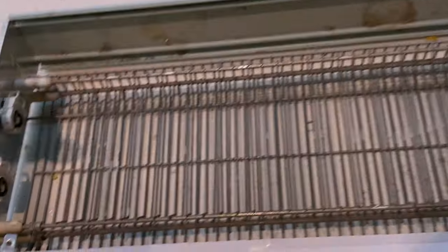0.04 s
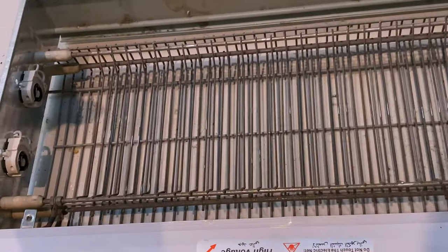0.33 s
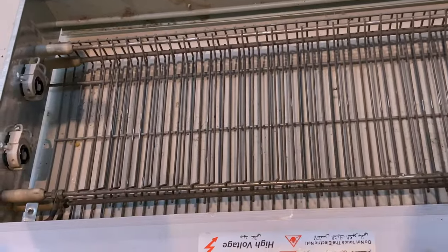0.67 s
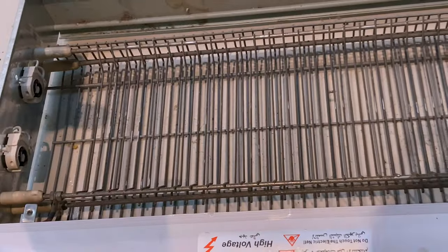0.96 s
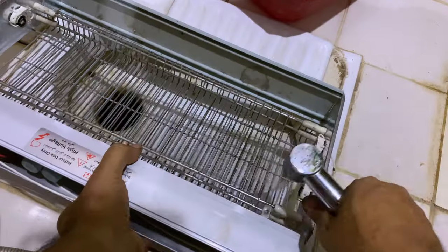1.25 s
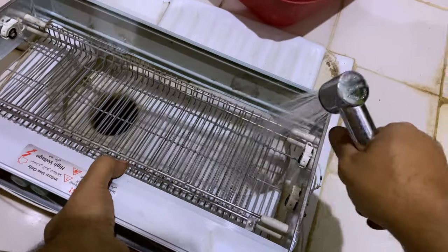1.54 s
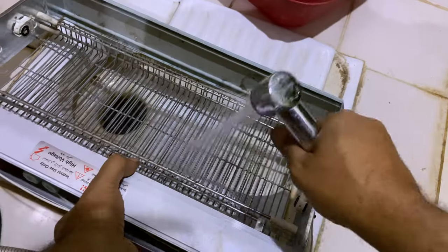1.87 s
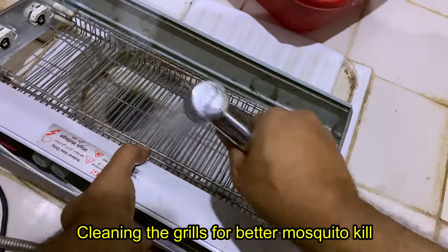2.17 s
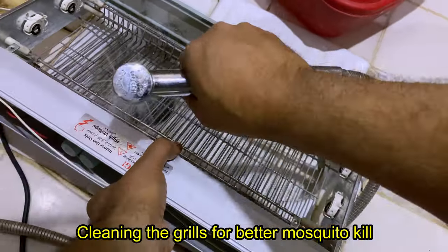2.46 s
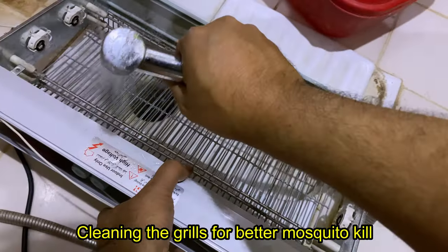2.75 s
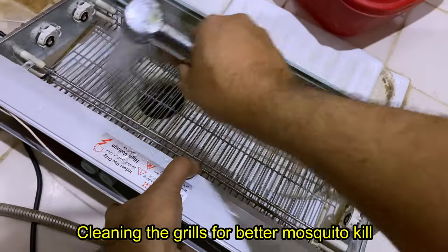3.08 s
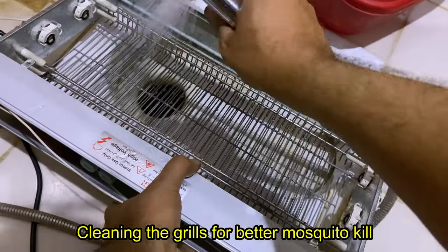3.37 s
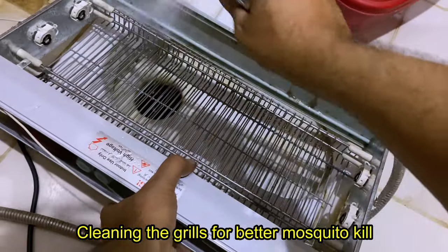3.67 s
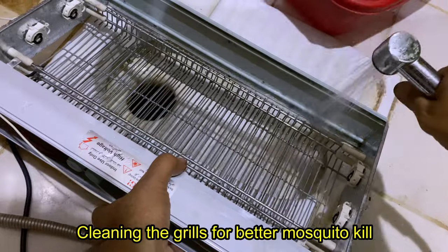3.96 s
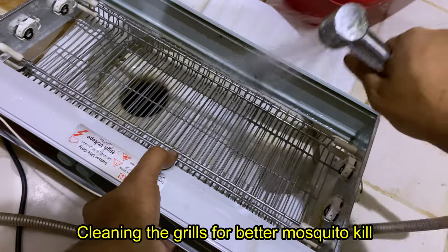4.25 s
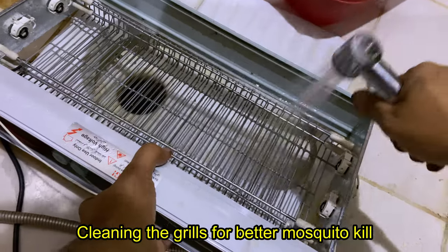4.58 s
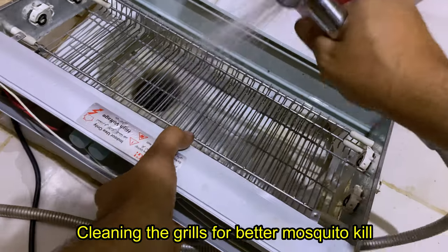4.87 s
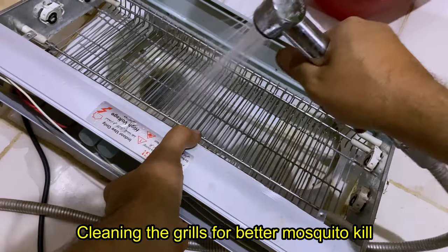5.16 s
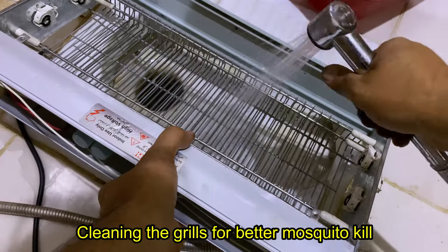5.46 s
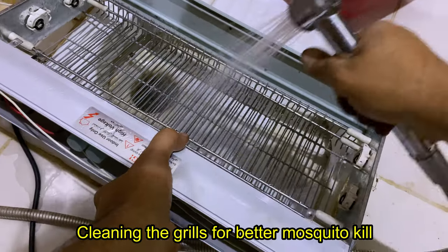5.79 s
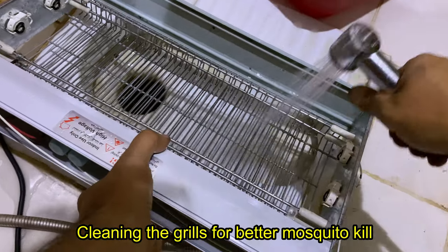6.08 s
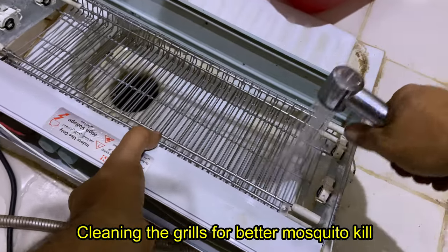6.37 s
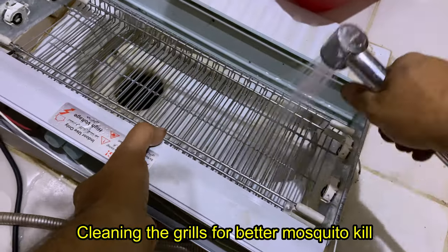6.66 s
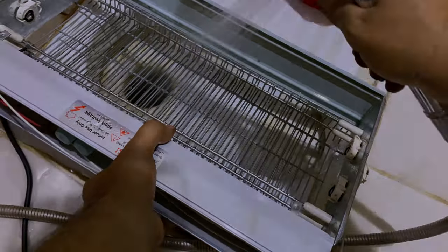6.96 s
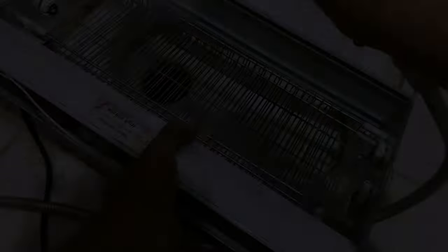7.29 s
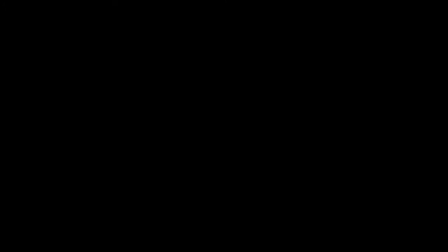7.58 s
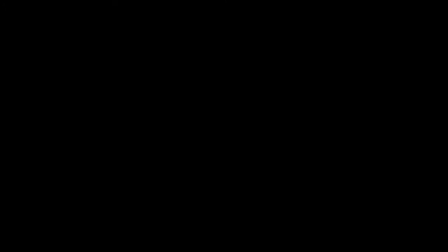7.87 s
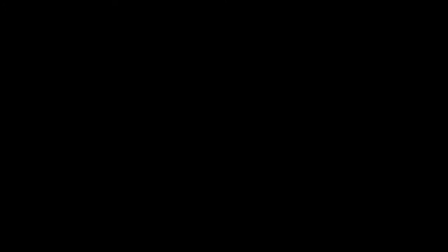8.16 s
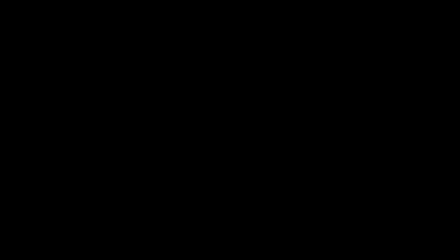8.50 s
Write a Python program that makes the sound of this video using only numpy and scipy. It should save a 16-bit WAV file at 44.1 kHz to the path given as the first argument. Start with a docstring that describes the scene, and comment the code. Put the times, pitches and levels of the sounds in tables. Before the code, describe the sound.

A metal housing with a wire grid clatters onto a tiled floor and rings briefly. Two light clicks and a soft rustle follow, then a low, wavering hum steps up abruptly. A hand shower spits once and runs, sizzling on the wires and drumming on the sheet metal. The drain glugs, the housing bumps softly twice and everything fades away. The microphone is close, with a short bathroom echo.

```python
"""Over a faint hum and hiss, a metal housing with a wire grid clatters onto a tiled bathroom floor.
After two clicks and a rustle the low, wavering hum steps up abruptly, and carries on beneath a hand
shower that spits once and runs: drops sizzle on the wires and drum on the sheet metal.
The drain glugs, the shell bumps twice and everything fades away.
One microphone, close to the housing, mono, with the short echo of the tiles behind."""
import sys
import numpy as np
from scipy import signal
from scipy.fft import rfft, irfft, next_fast_len
from scipy.io import wavfile
from scipy.ndimage import uniform_filter1d

SR = 44100
rng = np.random.default_rng(int(sys.argv[2]) if len(sys.argv) > 2 else 0)


def master_out(mix):
    """Clip the mix to full scale and print it as 16-bit PCM to the path in sys.argv[1]."""
    frames = np.transpose(np.atleast_2d(mix))
    ceiling = np.clip(frames, -1, 1)
    pcm = np.round(ceiling * 32767).astype(np.int16)
    wavfile.write(sys.argv[1], SR, pcm)


N = 376164
T = np.arange(N) / SR


def undb(db):
    """Decibels to gain."""
    return 10 ** (np.asarray(db) / 20)


def unit(x):
    """Scale to rms 1."""
    return x / np.sqrt(np.mean(x ** 2) + 1e-18)


def curve(rows):
    """A (t/s, value) table at every sample."""
    return np.interp(T, *np.transpose(rows))


def ramp(start, length):
    """Rise from 0 to 1 over length seconds."""
    return np.clip((T - start) / length, 0, 1)


def passing(s, half):
    """A bell from 0 to 1 and back, centred on time s."""
    return np.exp(-((T - s) / half) ** 2)


def colour(x, points):
    """Causal filter through (f/Hz, level/dB) points, falling steeply above the last one."""
    hz, db = np.transpose(points)
    size = 2 * next_fast_len(len(x))
    f = np.maximum(np.arange(size // 2 + 1) * SR / size, 1)
    skirt_db = -30 * np.clip(np.log2(f / hz[-1]), 0, 2)
    gain = undb(np.interp(np.log(f), np.log(hz), db) + skirt_db)
    cepstrum = irfft(np.log(gain))
    cepstrum[1:size // 2] *= 2  # fold to minimum phase
    cepstrum[size // 2 + 1:] = 0
    return irfft(rfft(x, size) * np.exp(rfft(cepstrum)))[:len(x)]


def noise(points):
    """Noise of rms 1, coloured by (f/Hz, level/dB) points."""
    return unit(colour(rng.standard_normal(N), points))


def walk(rate):
    """Smooth random drift of rms 1, turning rate times a second."""
    hold = max(int(SR / rate), 1)
    steps = np.repeat(rng.standard_normal(N // hold + 1), hold)
    return unit(uniform_filter1d(steps, hold)[:N])


def strikes(times, db):
    """One impulse for each event."""
    return np.bincount((np.asarray(times) * SR).astype(int), undb(db), N)[:N]


def convolve(x, response):
    """Play x through a response."""
    return signal.fftconvolve(x, response)[:N]


def decay(t60):
    """One second of exponential decay."""
    return np.exp(-np.log(1000) * T[:SR] / t60)


def ring(modes):
    """Response of (f/Hz, level/dB, t60/s) modes to one blow."""
    return sum(undb(db) * decay(t60) * np.sin(2 * np.pi * hz * T[:SR]) for hz, db, t60 in modes)


# bathroom air: f/Hz, level/dB
AIR_SPECTRUM = [(25, -31.5), (65, 15.5), (170, 0.5), (280, -3), (800, -24), (1500, -21.5), (2500, -25.5),
                (15500, -33)]


def room_tone(air_db=-52):
    """The quiet of the bathroom, mostly bass."""
    return undb(air_db) * noise(AIR_SPECTRUM)


def scuff(scuff_db=-59, sag_db_per_s=75):
    """A faint hiss of handling dies away before the knock."""
    hiss = noise([(1000, -1.5), (4000, -4), (7000, -1), (15000, 3)])
    return undb(scuff_db - sag_db_per_s * T) * hiss


# the hum once it has stepped up, and the rumble below it: t/s, level/dB
HUM_LEVELS = [(1.25, -23.5), (1.4, -24), (1.76, -28), (1.95, -24), (2.47, -21.5), (2.6, -29.5),
              (2.85, -22.5), (3.8, -27.5), (4.03, -23.5), (4.55, -23.5), (5.05, -29.5), (5.3, -26.5),
              (5.75, -30.5), (6.25, -23), (6.53, -31), (6.75, -23.5), (7.85, -28)]
RUMBLE_LEVELS = [(1.15, -62), (1.25, -39), (5.0, -40.5), (6.7, -40), (7.85, -47.5)]
# their spectra: f/Hz, level/dB
HUM_SPECTRUM = [(80, -39.5), (100, -17.5), (113, -5), (122, 2.5), (130, -8), (145, -19.5), (165, -37.5),
                (185, -55.5)]
RUMBLE_SPECTRUM = [(20, -30.5), (40, -20.5), (55, -1.5), (67, 7), (80, 4.5), (100, -12), (150, 4.5),
                   (200, -47)]


def hum(idle_db=-47.5, step_s=1.232, rise_s=0.0137, steadiness=0.81, rush_db=-28):
    """A narrow, wavering low hum idles, then steps up abruptly with a soft rush and a deep rumble."""
    tone = noise(HUM_SPECTRUM)
    envelope = np.sqrt(uniform_filter1d(tone ** 2, size=3000) + 1e-9)
    tone = unit(tone / envelope ** steadiness)  # evens out most of the wavering
    rush = noise([(120, -15), (250, 10.5), (400, 4.5), (1000, -1), (2300, -8.5), (4000, -36),
                  (9000, -35)])
    level_db = idle_db + ramp(step_s, rise_s) * (curve(HUM_LEVELS) - idle_db)
    rumble = undb(curve(RUMBLE_LEVELS)) * noise(RUMBLE_SPECTRUM)
    return undb(level_db) * (tone + undb(rush_db) * rush) + rumble


# reverberation of the bathroom: f/Hz, t60/s
ROOM_DECAY = [(150, 0.59), (500, 0.52), (1500, 0.47), (5000, 0.39), (14000, 0.45)]


def tiles(x):
    """Diffuse echo off the tiled walls; the bass lasts longest."""
    hz, t60 = np.transpose(ROOM_DECAY)
    edges = np.geomspace(120, 16000, 8)
    tail = 0
    for lo, hi in zip(edges, edges[1:]):
        bandpass = signal.butter(2, [lo, hi], "band", fs=SR, output="sos")
        band = signal.sosfilt(bandpass, rng.standard_normal(SR))
        tail = tail + band * decay(np.interp(np.sqrt(lo * hi), hz, t60))
    tail = tail * np.minimum(T[:SR] / 0.012, 1)
    return convolve(x, tail / np.sqrt(np.sum(tail ** 2)))


# blows on the floor, close by: t/s, crack/dB, clack/dB, housing ring/dB, grid ring/dB, thump/dB
BLOWS = [(0.3468, 1.5, 6, -2.5, -2.5, 0), (.3628, -1, 3.5, -10, -16, -3.5),
         (0.3754, -7, -13, -31, -25, 1.5), (0.5086, -8, -0.5, -22, -25, -27),
         (0.516, -10, -12, -26, -41, -7)]
# bright crack of metal on tile, hollow clack of damped sheet metal: f/Hz, level/dB
CRACK_SPECTRUM = [(1500, -26), (2500, -25), (2900, 3), (3220, -9), (3500, 0), (3900, -19), (4400, 4),
                  (4820, 6), (5150, -5), (5700, -7), (6250, 3.5), (6820, -12), (7250, 0), (7650, 1.5),
                  (8100, -10), (8600, -1), (10000, -5), (15500, -8)]
CLACK_SPECTRUM = [(130, -21), (210, 15.5), (400, 8), (560, 1), (780, 2.5), (1150, 4.5), (1400, -2),
                  (1750, 1.5), (2300, -31)]
# modes of the housing, its grid (close pairs that beat) and its slow flexing: f/Hz, level/dB, t60/s
HOUSING_MODES = [(176.7, 6, 0.63), (206, -6, .4), (248, -10, .8), (319, -9.5, 0.8), (384, -12, 0.37),
                 (424, -14, .8), (457, -15, .5), (548, -9.5, 0.61), (694, -16, .7), (806, -17, .55),
                 (1050, -20, .45), (1110, -10.5, 0.58), (1292, -19, .5)]
GRID_MODES = [(1567, -4, .8), (1598, -15, .5), (1660, -22, .4), (1868, -23, .5), (2875, -14.5, .35),
              (3106, -23, .5), (3321, -20, .5), (3488, -17, .55), (4301, -21, .4), (4365, -9, .38),
              (4506, .5, .44), (4565, -3.5, .42), (4756, -4, .34), (4822, -8, .32), (5809, -21, .25),
              (6185, -20, .2), (7500, -22, .25), (8371, -17, .18)]
FLEX_MODES = [(132.8, 0.5, 0.38), (144.8, -8, 1.29), (114.8, -16.5, 1.7), (70, -18.5, 2.5)]
# finer sheet modes blurred into a thud, loose wires shivering together: f/Hz, level/dB
SHEET_SPECTRUM = [(150, -20), (260, 4), (400, 6), (600, -5.5), (900, -1), (1150, -5), (1400, -2),
                  (1750, -3), (2200, -23)]
SHIVER_SPECTRUM = [(2500, -35), (2900, -22), (3200, -24), (3500, -13), (3900, -45), (4350, -9), (4550, 2),
                   (4850, -5), (5100, -28), (9000, -37)]


def knocks(room_db=-8.5):
    """The housing lands and settles: each blow cracks, rings sheet metal and grid, flexes the shell."""
    times, crack_db, clack_db, housing_db, grid_db, thump_db = np.transpose(BLOWS)
    crack = undb(-17) * convolve(strikes(times, crack_db), decay(0.025)) * noise(CRACK_SPECTRUM)
    clack = undb(-18) * convolve(strikes(times, clack_db), decay(0.029)) * noise(CLACK_SPECTRUM)
    housing_hits, grid_hits = strikes(times, housing_db), strikes(times, grid_db)
    housing = undb(-27) * convolve(housing_hits, ring(HOUSING_MODES))
    grid = undb(-30) * convolve(grid_hits, ring(GRID_MODES))
    thud = undb(-37) * convolve(housing_hits, decay(0.63)) * noise(SHEET_SPECTRUM)
    shiver = undb(-33) * convolve(grid_hits, decay(0.28)) * noise(SHIVER_SPECTRUM)
    flex = undb(-16) * convolve(strikes(times, thump_db), ring(FLEX_MODES))
    contact = crack + clack
    echo = colour(tiles(contact), [(200, -2.5), (1400, 0.5), (2500, -3), (6000, -4.5), (14000, -6)])
    # the knocks carry little deep bass, below about 90 Hz
    low_cut = signal.butter(4, 92, "high", fs=SR, output="sos")
    body = signal.sosfilt(low_cut, housing + grid + flex + contact)
    return body + thud + shiver + undb(room_db) * echo


# light clicks near the microphone: t/s, level/dB
CLICK_HITS = [(0.913, 3), (1.046, -8.5)]
# their spectrum: f/Hz, level/dB
CLICK_SPECTRUM = [(300, -13), (900, -13), (1350, 7), (2100, -22), (3200, 0), (4300, -11), (5900, 3),
                  (8000, -12), (11000, 3), (15000, -6)]


def clicks(click_db=-41, t60=0.014, room_db=-21):
    """Small, nearly dry clicks as things are handled."""
    hits = strikes(*np.transpose(CLICK_HITS))
    direct = undb(click_db) * convolve(hits, decay(t60)) * noise(CLICK_SPECTRUM)
    return direct + undb(room_db) * tiles(direct)


def rustle(start=1.083, rise_s=0.013, sag_db_per_s=45, rustle_db=-59.5):
    """A soft rustle as the hand takes up the shower head."""
    level_db = rustle_db - sag_db_per_s * np.maximum(T - start - rise_s, 0)
    rub = noise([(600, -13), (1200, -5), (2100, 1), (3000, -4), (4000, -3), (6500, -16), (15000, -25)])
    return undb(level_db) * ramp(start, rise_s) * rub


# shower trigger, a short spit and then the rinse: opens/s, shuts/s, surge/dB
TRIGGER = [(1.31, 1.362, 5.5), (1.425, 9, 3)]


def flow(dribble_db=-39.5, open_s=0.019, drain_s=0.018, shut_db_per_s=1000):
    """Water through the valve, 1 when steady; each squeeze surges as the stored pressure drains."""
    water = undb(dribble_db) * ramp(1.042, 0.039) ** 2  # the valve leaks under the thumb
    for opens, shuts, surge_db in TRIGGER:
        excess_db = surge_db * np.exp(-np.maximum(T - opens - open_s, 0) / drain_s)
        closing_db = shut_db_per_s * np.maximum(T - shuts, 0)
        water = water + ramp(opens, open_s) ** 2 * undb(excess_db - closing_db)
    return water


# how hard the roaming jet hits the wires: t/s, level/dB
JET_AIM = [(1.46, -35), (2.15, -37.5), (2.4, -36), (2.92, -41.5), (3.01, -35.5), (3.16, -35.5), (3.26, -37),
           (3.5, -38), (3.63, -32.5), (3.74, -33.5), (3.8, -30.5), (3.95, -31), (4.14, -32.5), (4.3, -34.5),
           (4.42, -31.5), (4.6, -34), (5.0, -37.5), (5.4, -35), (6.4, -36), (6.9, -34.5), (7.0, -38),
           (7.11, -38), (7.2, -32), (7.29, -41), (7.37, -39.5), (7.45, -33.5), (7.55, -35.5), (7.62, -44),
           (7.68, -39), (7.75, -41.5), (7.8, -45.5), (7.9, -40.5), (8.2, -42.5)]
# instants when it slips between the bars: t/s, dip/dB
JET_SLIPS = [(1.495, -7), (3.845, -4.5), (4.2, -2), (4.93, -3), (5.04, -6), (5.272, -3.5), (6.0, -6.5),
             (6.52, -2.5)]


def jet_force(slip_half_s=0.019):
    """Strength of the jet on the wires: its aim times the flow, dipping at each slip."""
    dips_db = sum(db * passing(s, slip_half_s) for s, db in JET_SLIPS)
    return undb(curve(JET_AIM) + dips_db) * flow()


def resonances(rows, roam_db, rate):
    """Resonances stirred by the water; each swells as the jet passes and wavers on its own."""
    total = 0
    for hz, width, db, s, half, swell_db in rows:
        peak = signal.iirpeak(hz, hz / width, fs=SR)
        mode = unit(signal.lfilter(*peak, rng.standard_normal(N)))
        total = total + mode * undb(db + swell_db * passing(s, half) + roam_db * walk(rate))
    return total


def spatter(rate=90, size=0.19, t60=0.045):
    """Gain of the spray: small slugs of water lift it at once and die away."""
    slugs = (rng.random(N) < rate / SR) * np.minimum(rng.exponential(size=N), 2)
    return 1 + size * convolve(slugs, decay(t60))


# spray and fizz on the grid, close up: f/Hz, level/dB
SPRAY_SPECTRUM = [(1800, -37), (3200, -18), (4500, -8.5), (6300, -5), (8500, -2), (11000, -3), (13500, 3.5),
                  (15500, 3)]
FIZZ_SPECTRUM = [(3000, -32), (5200, -6), (6000, -1), (6800, -5.5), (8500, 2), (10600, 4.5), (11600, -0.5),
                 (12500, -1), (15500, -6)]
# wet wire resonances: f/Hz, width/Hz, level/dB, jet passes/s, half length/s, swell/dB
WIRE_BANDS = [(4030, 220, -36, 3.72, .22, 15), (6700, 500, -31, 3.86, .25, 15),
              (10700, 510, -25.5, 3.75, 0.5, 19.5), (12600, 800, -25, 3.9, 0.39, 18),
              (14800, 900, -21, 3.7, .35, 11), (4000, 240, -36.5, 7.47, 0.092, 22),
              (4430, 360, -34, 7.4, 0.21, 20), (9650, 800, -25, 8.5, 0.16, 21),
              (11900, 650, -16.5, 7.5, 0.33, 11)]
# treble lost behind the shower head: f/Hz, level/dB
HEAD_SHADOW = [(8000, 1), (11500, -3.5), (13500, -4), (15500, -9)]


def sizzle(jet_db=-0.4, drops_per_s=4000, spread_db=2, mist_db=-1, clump_db=1.96, square_hit_db=-32.5):
    """Thousands of droplets tick on the wires in clumps over a fine mist."""
    sizes = undb(spread_db * np.minimum(rng.exponential(size=N), 6))
    drops = (rng.random(N) < drops_per_s / SR) * sizes * rng.choice([-1, 1], N)
    mist = undb(mist_db) * rng.standard_normal(N)
    spray = unit(colour(unit(drops) + mist, SPRAY_SPECTRUM))
    clumps = unit(undb(clump_db * walk(200)) * spatter())
    force = jet_force()
    # the more squarely the jet hits, the more the wires fizz
    fizz = undb(-4 - square_hit_db) * force * noise(FIZZ_SPECTRUM)
    wires = resonances(WIRE_BANDS, roam_db=3.5, rate=9)
    dull_taps = undb(-22) * noise([(300, 16.5), (900, -5.5), (2500, -4), (5000, 1), (9000, -28)])
    hiss = undb(jet_db) * force * clumps * (spray + fizz + wires + dull_taps)
    hidden = passing(2.5, 0.13)  # the shower head passes in front of the jet
    return (1 - hidden) * hiss + hidden * colour(hiss, HEAD_SHADOW)


# water on the sheet metal: t/s, level/dB
WASH_LEVELS = [(1.6, -47), (2.4, -46), (2.8, -47), (3.08, -47.5), (3.16, -45), (3.24, -49), (3.45, -49),
               (3.8, -48), (4.25, -51), (4.65, -46.5), (6.6, -47), (7.3, -50), (7.85, -50.5)]
# its spectrum: f/Hz, level/dB
WASH_SPECTRUM = [(100, 0), (200, 0), (260, -7.5), (340, 3.5), (390, 6), (500, -0.5), (630, -9.5), (730, 2),
                 (860, 0.5), (1100, 2), (1800, -2.5), (3000, -1.5), (3400, -4), (5000, -6.5), (15000, -7.5)]
# wet panel resonances: f/Hz, width/Hz, level/dB, jet passes/s, half length/s, swell/dB
PANEL_BANDS = [(253, 19, -22.5, 6.65, 0.29, 21.5), (398.6, 24, -12.5, 3.5, 2.2, 7.5),
               (690, 50, -24.5, 3.7, 0.98, 18.5), (733, 26, -15.5, 6.2, 1.6, 5),
               (1011, 33, -13.5, 5.7, 1.5, 8), (1343, 90, -20.5, 3.76, 0.95, 10.5),
               (1546, 76, -16, 4.02, 0.62, 12), (1875, 40, -19.5, 6.65, 0.19, 13),
               (2065, 47, -21, 6.6, 0.3, 17), (2250, 50, -22, 6.4, 0.43, 17),
               (2368, 44, -11, 3.16, 0.28, 10), (2340, 110, -22.5, 7.72, 0.64, 19),
               (4650, 1400, -23, 5.96, 0.48, 22), (4260, 2300, -25, 3.16, 0.068, 27),
               (509, 12, -19.5, 2.4, 2, 8), (1820, 450, -24.5, 1.87, 0.79, 17.5),
               (945, 170, -23.5, 7.9, 0.16, 21.5), (2843, 30, -15.5, 2.2, 1.3, 8.5),
               (2780, 43, -21, 6.66, .2, 21.5), (2850, 110, -20.5, 7.54, 0.71, 15),
               (2876, 32, -16.5, 5.7, 0.7, 12.5), (3190, 40, -23.5, 1.9, 1.7, 15.5),
               (3124, 48, -16.5, 6.5, 0.31, 11.5)]


def wash(drum_db=3, panel_db=-1, patter_db=1.66, flow_exponent=0.43):
    """Water drums on the sheet metal; the panel resonances take turns as the jet roams."""
    water = flow()
    drumming = undb(drum_db) * noise(WASH_SPECTRUM) * unit(undb(patter_db * walk(60)))
    panels = undb(panel_db) * resonances(PANEL_BANDS, roam_db=1.5, rate=4) * np.sqrt(water)
    return (drumming + panels) * undb(curve(WASH_LEVELS)) * water ** flow_exponent


# the fattest drops on the wires: t/s, spray/dB, tap/dB, t60/s
FAT_DROPS = [(1.522, -25, -46, 0.033), (1.673, -30, -52, .03), (1.724, -26.5, -52, 0.045),
             (1.772, -25.5, -48, 0.041), (1.8672, -25.5, -50, .03), (1.966, -27, -40, .03),
             (1.994, -25, -48, 0.033), (2.4513, -36, -32, 0.048), (2.5235, -33, -45, .03),
             (2.656, -26.5, -44, 0.037), (2.814, -31, -50, 0.044), (3.0708, -22.5, -46, 0.028),
             (3.2234, -30, -55, .04), (3.348, -31, -37, 0.034), (3.391, -27, -48, 0.016),
             (3.58, -24.5, -52, 0.02), (3.602, -23, -36, .03), (3.8576, -27, -42, 0.055),
             (4.059, -32, -48, .025), (4.115, -27, -48, 0.033), (4.154, -25, -31.5, 0.052),
             (4.225, -27, -39, 0.061), (4.393, -22.5, -32.5, 0.064), (4.4364, -23.5, -29, 0.039),
             (4.5334, -24.5, -48, 0.02), (4.5568, -40, -29, 0.033), (4.6325, -38, -29.5, .035),
             (4.669, -28, -29, 0.035), (4.7725, -28.5, -52, 0.044), (4.946, -31, -43, .06),
             (5.004, -29, -48, 0.07), (5.0656, -26, -42, 0.077), (5.122, -29.5, -41, .05),
             (5.286, -24, -50, 0.013), (5.3052, -25, -43, 0.022), (5.4505, -25, -37, 0.031),
             (5.7167, -25, -32, .03), (5.796, -35, -32.5, .03), (6.014, -28.5, -37, 0.061),
             (6.545, -29.5, -39, 0.069), (7.022, -29, -44, .025), (7.037, -45, -32, 0.033),
             (7.121, -29, -34, 0.015), (7.146, -29, -34.5, .035), (7.187, -25.5, -50, .04),
             (7.311, -26, -48, 0.014), (7.358, -29, -43, 0.022), (7.3842, -26, -36, .025),
             (7.429, -30, -38, .04), (7.4655, -29, -32.5, 0.044), (7.5256, -32, -46, .035),
             (7.633, -34, -43, 0.025), (7.8933, -37, -40, .04)]


def splats(spray_db=2, tap_db=-1, rise_s=0.00049):
    """Fat drops tap the bars and burst into a brief spray."""
    sprays, taps = np.zeros((2, N + SR))
    for s, spray, tap, t60 in FAT_DROPS:
        burst = decay(t60) * np.minimum(T[:SR] / rise_s, 1)
        burst /= burst.max()
        start = int(s * SR)
        sprays[start:start + SR] += undb(spray + spray_db) * burst
        taps[start:start + SR] += undb(tap + tap_db) * burst
    hiss = noise([(1000, -39), (4000, -8.5), (7000, 9.5), (10000, 9.5), (15500, 13)])
    knock = noise([(150, -10), (450, -13), (1000, 0.5), (3000, -4), (5500, 2.5), (9000, -16),
                   (15500, -19)])
    return sprays[:N] * hiss + taps[:N] * knock


# air pockets down in the drain: t/s, f/Hz, level/dB, length/s
AIR_POCKETS = [(2.331, 575, -13, 0.047), (2.381, 518, -6, 0.031), (2.404, 480, -12, 0.023),
               (2.449, 493, -3.5, 0.023), (2.498, 504, -4, 0.018), (2.526, 530, -16, 0.023),
               (2.70, 670, -12, 0.012), (3.826, 553, -11, 0.017), (4.945, 534, -15, 0.028),
               (5.232, 463, -13, 0.022)]


def glugs(glug_db=-29, sag=0.13, roughness=0.53, room_db=-11):
    """Air pockets ring briefly and unevenly in the drain, sagging a little in pitch."""
    direct = np.zeros(N)
    for s, hz, db, length in AIR_POCKETS:
        age = np.linspace(0, 1, int(length * SR))
        phase = 2 * np.pi * np.cumsum(hz * (1 - sag * (age - .5))) / SR
        envelope = np.sqrt(np.abs(np.sin(np.pi * age)))
        start = int(s * SR)
        direct[start:start + len(age)] += undb(db + glug_db) * envelope * np.sin(phase)
    direct *= 1 + roughness * walk(300)
    return direct + undb(room_db) * tiles(direct)


# the shell touching the floor: t/s, level/dB
BUMP_HITS = [(7.009, -2.5), (7.021, 2), (7.036, -2), (7.152, -4.5)]
# its hollow ring: f/Hz, level/dB, t60/s
CAVITY_MODES = [(390, -6, .12), (498, 2, 0.1), (528, -3.5, .1), (590, -11, .07)]


def bumps(bump_db=-29, contact_s=0.0028, room_db=-19):
    """The held shell rocks on the tiles: soft contacts ring its cavity briefly."""
    soft_ring = ring(CAVITY_MODES) * np.minimum(T[:SR] / contact_s, 1)
    direct = undb(bump_db) * convolve(strikes(*np.transpose(BUMP_HITS)), soft_ring)
    return direct + undb(room_db) * tiles(direct)


def scene(fade_from_s=7.85, fade_db_per_s=20, fade_db_per_s2=16.5):
    """All sources at one close microphone, alike in both channels; the end fades ever faster."""
    rinse = sizzle() + splats() + wash() + glugs() + bumps()
    handling = knocks() + clicks() + scuff() + rustle()
    age = np.maximum(T - fade_from_s, 0)
    ending = undb(-fade_db_per_s * age - fade_db_per_s2 * age ** 2)
    lingering = ending ** 0.96  # the hum fades a little slower than the water
    mono = handling + ending * (rinse + room_tone()) + lingering * hum()
    return np.array([mono, mono])


def record(dry, low_hz=38, peak_limit=0.52, top_hz=15750):
    """The recorder drops the deepest bass, rounds off the loudest peaks and cuts the top."""
    lean = signal.sosfilt(signal.butter(3, low_hz, "high", fs=SR, output="sos"), dry)
    rounded = lean / (1 + (lean / peak_limit) ** 4) ** .25
    return signal.sosfilt(signal.ellip(10, .2, 80, top_hz, fs=SR, output="sos"), rounded)


dry = scene()
out = record(dry)
master_out(out)
```